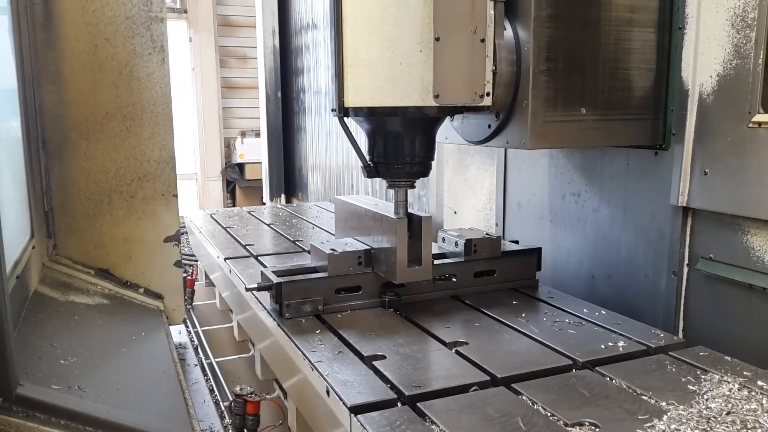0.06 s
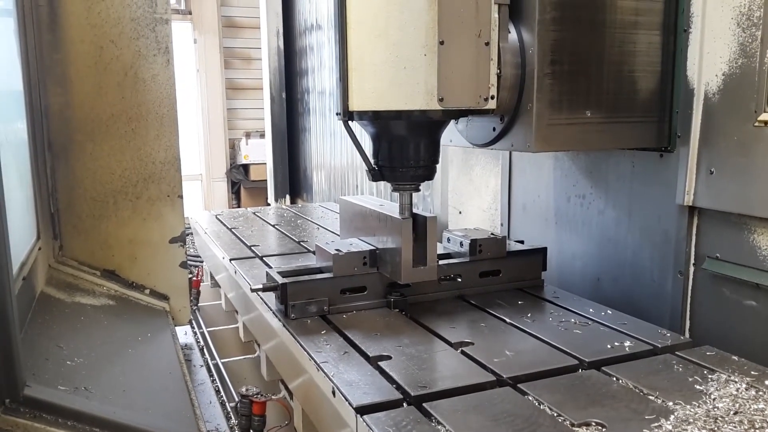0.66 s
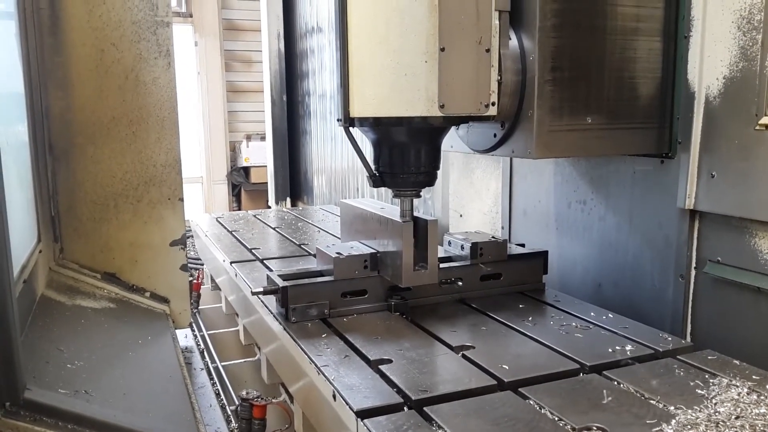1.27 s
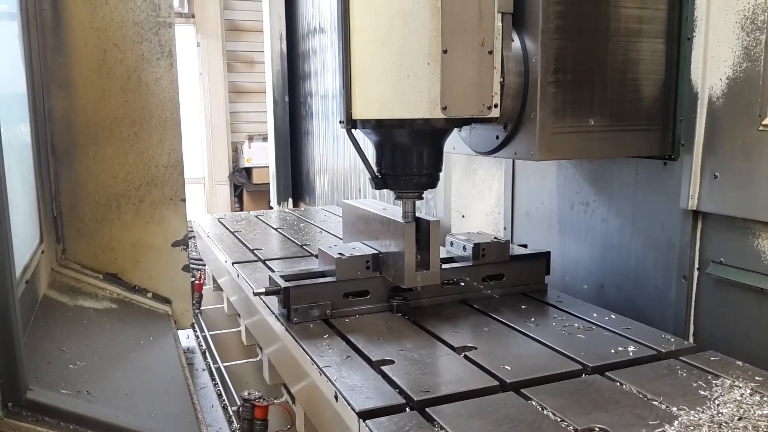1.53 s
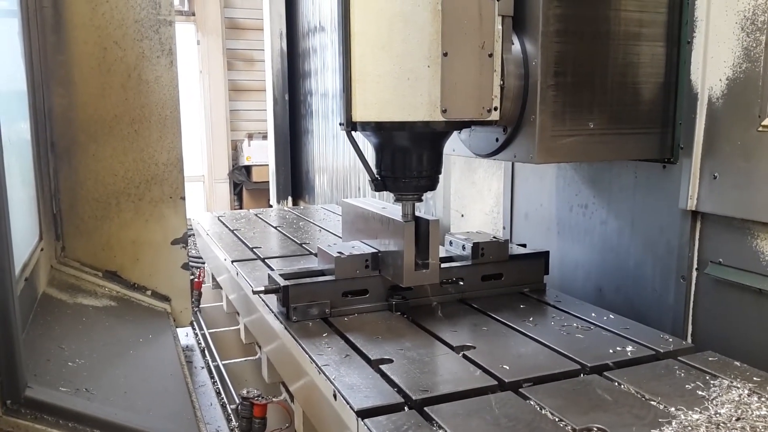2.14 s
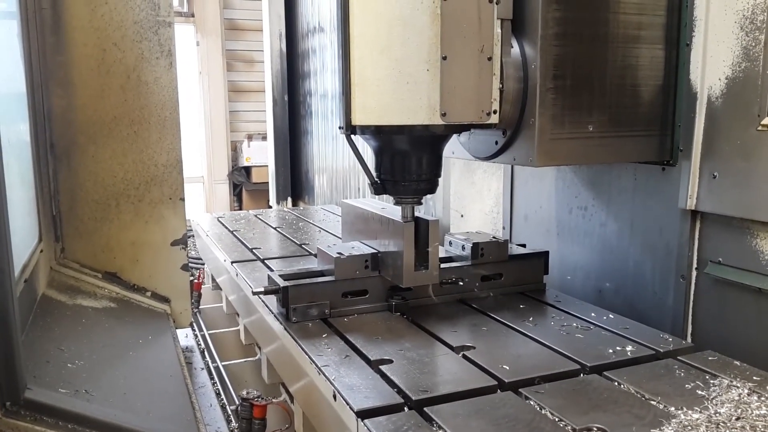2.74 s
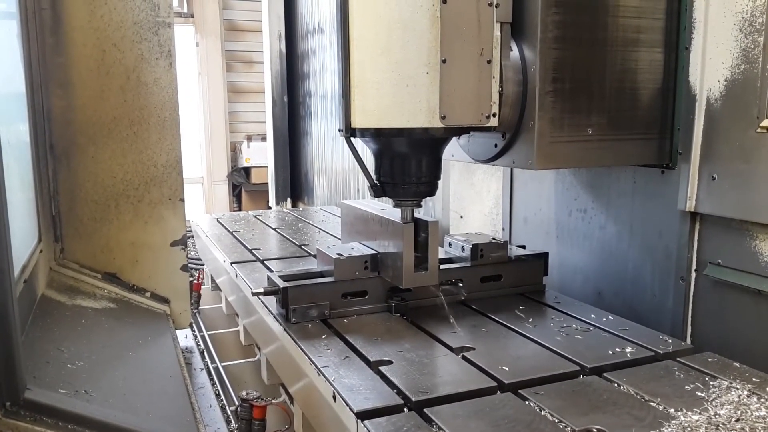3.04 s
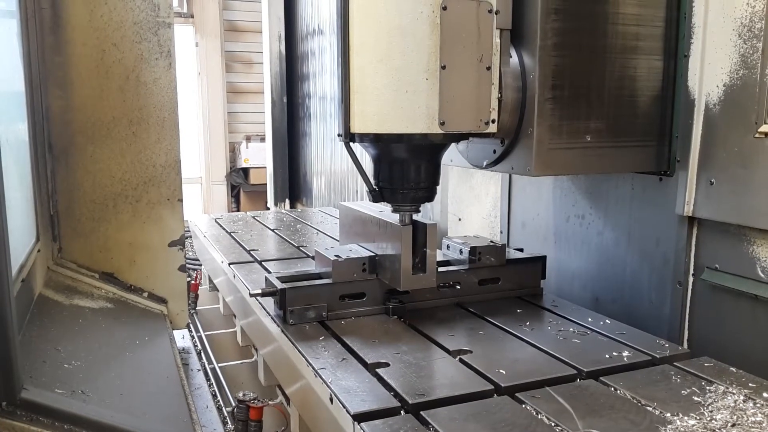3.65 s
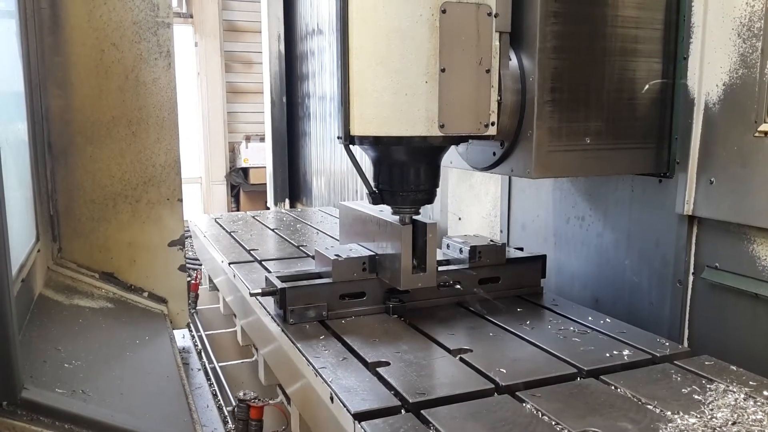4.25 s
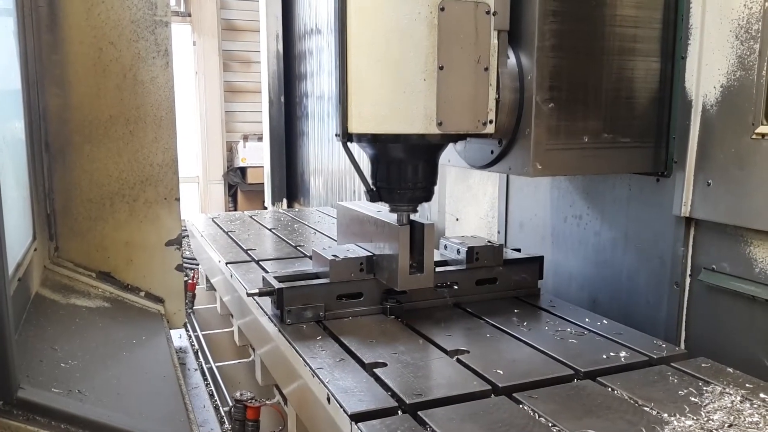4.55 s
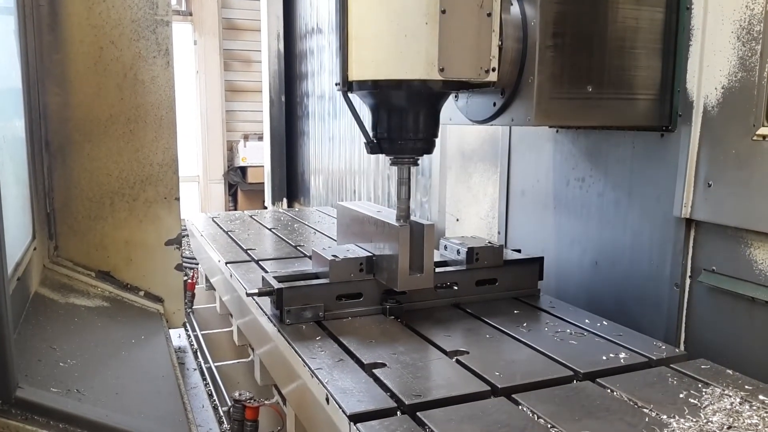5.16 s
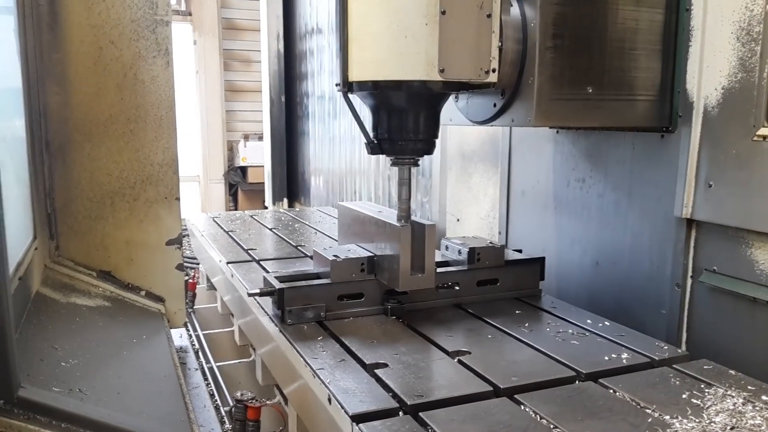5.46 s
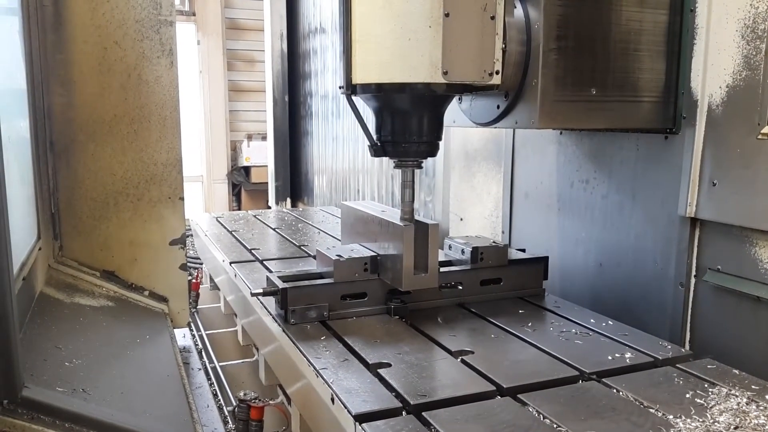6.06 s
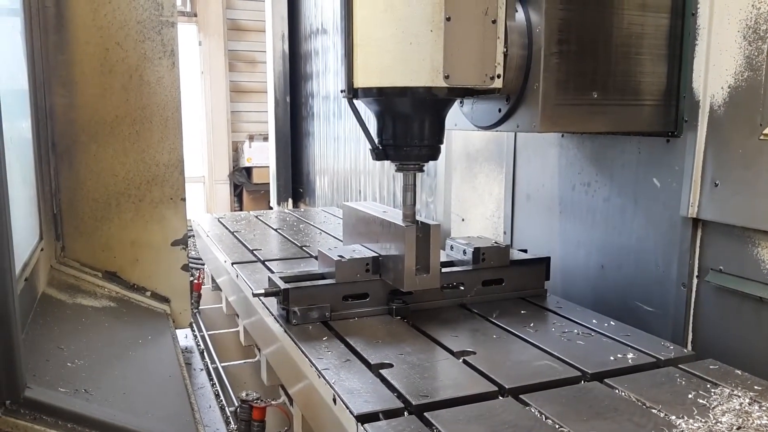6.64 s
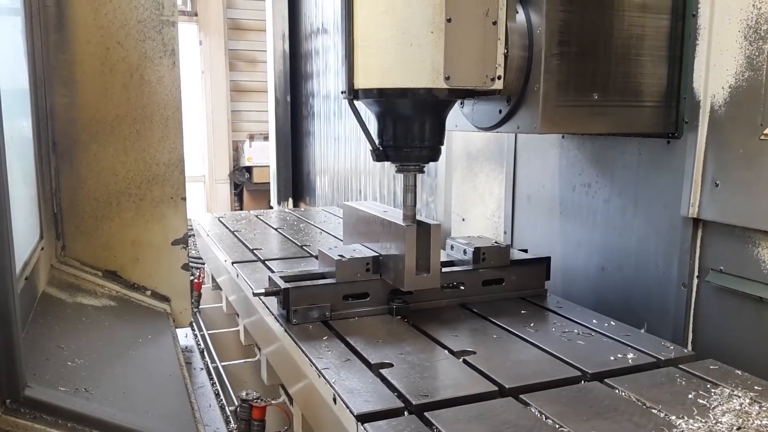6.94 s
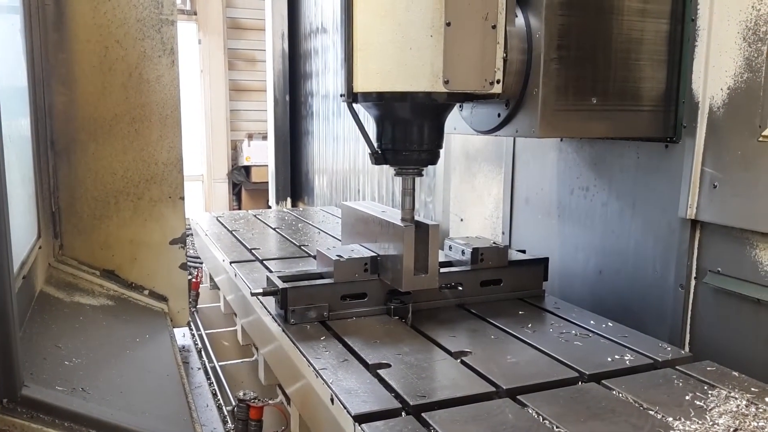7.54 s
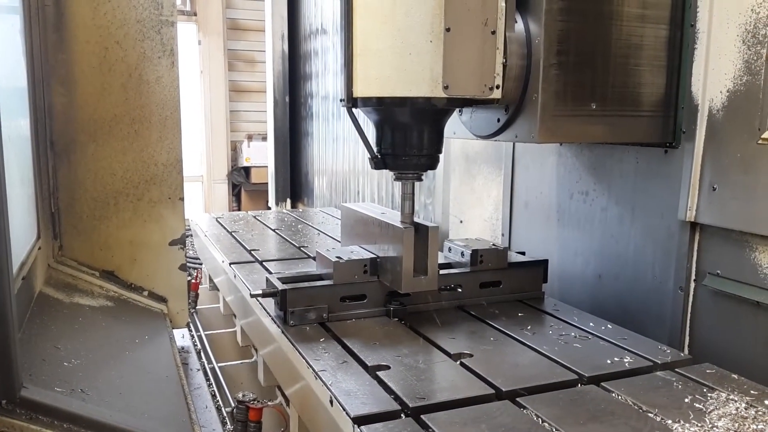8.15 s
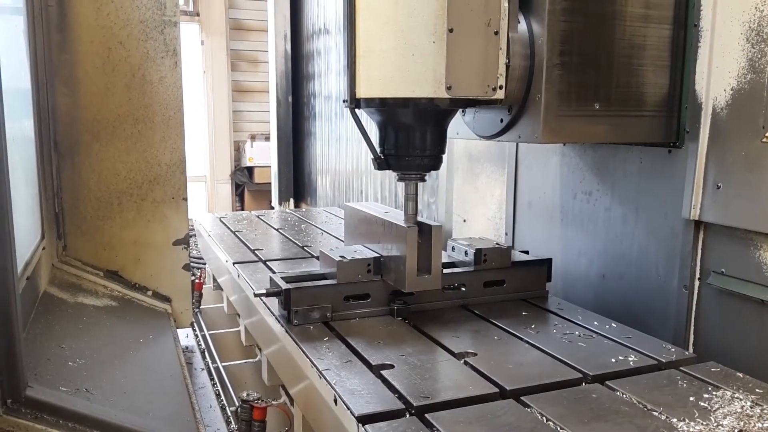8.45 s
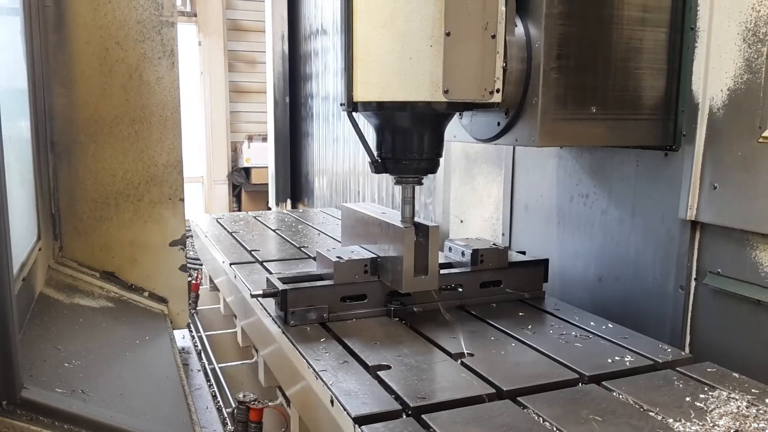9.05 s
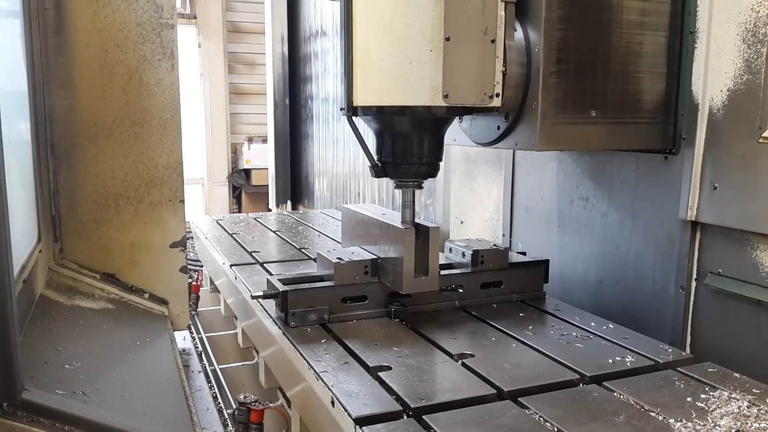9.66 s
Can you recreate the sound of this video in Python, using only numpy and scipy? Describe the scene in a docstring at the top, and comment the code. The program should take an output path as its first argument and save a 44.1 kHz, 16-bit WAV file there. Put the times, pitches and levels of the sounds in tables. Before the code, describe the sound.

A milling machine rasps through metal under a hissing, whistling air jet, judders briefly in the middle, then lifts clear while the air keeps blowing.

```python
"""A four-flute end mill cuts a metal block in a machining centre, cleared by compressed air. From the start the
jet hisses, whistles on the turning flutes and blows the slot into a hollow tone; the cutter rasps over dull
pops and workshop noise. At 4.5 s it judders in a corner over a run of dull pops. At 5 s it rubs the wall and
lifts clear while the air keeps blowing. From about 8 s it eases back in."""
import sys
import numpy as np
from scipy import signal
from scipy.fft import rfft, irfft, next_fast_len
from scipy.io import wavfile
from scipy.ndimage import uniform_filter1d, minimum_filter1d

SR = 44100
rng = np.random.default_rng(int(sys.argv[2]) if len(sys.argv) > 2 else 0)


def generate_wav(sig):
    """Save sig (samples, or channels by samples) to the path in sys.argv[1] as 16-bit PCM at SR."""
    pcm = np.round(np.clip(np.atleast_2d(sig).T, -1, 1) * 32767).astype(np.int16)
    wavfile.write(sys.argv[1], SR, pcm)


N = 432179
TIME_S = np.arange(N) / SR
FLUTE_HZ = 80.0   # flute passing rate


def from_db(db):
    """Decibels to gain."""
    return 10 ** (np.asarray(db) / 20)


def unit_rms(x):
    """Scale the channel mean to rms 1."""
    return x / np.sqrt(np.mean(np.abs(np.atleast_2d(x).mean(0)) ** 2) + 1e-20)


def curves(rows):
    """One per-sample curve for each column after time_s."""
    time_s, *columns = np.transpose(rows)
    return [np.interp(TIME_S, time_s, column) for column in columns]


def panned(pan_db):
    """Stereo gains of unit mean power; pan_db is left over right."""
    ratio = from_db(np.atleast_1d(pan_db))
    return np.array([ratio, np.ones_like(ratio)]) * np.sqrt(2 / (1 + ratio ** 2))


def drift(rate_hz):
    """Slow random curve, rms 1."""
    hop, settle = 20, 2000
    pole = np.exp(-2 * np.pi * hop * rate_hz / SR)
    noise = rng.standard_normal(N // hop + settle + 2)
    slow = signal.lfilter([1], [1, -2 * pole, pole * pole], noise)[settle:]
    return np.interp(np.arange(N) / hop, np.arange(len(slow)), unit_rms(slow))


def stereo_noise(correlation, size=N):
    """White noise, partly shared by both sides."""
    noise = rng.standard_normal((3, size))
    return np.sqrt(correlation) * noise[0] + np.sqrt(1 - correlation) * noise[1:]


def shaped_noise(spectrum, correlation):
    """Noise with a separate spectrum per side, rms 1."""
    size = next_fast_len(N, real=True)
    log_hz = np.log(np.maximum(np.arange(size // 2 + 1) * SR / size, 1))
    freq_hz, *sides_db = np.transpose(spectrum)
    gain = from_db([np.interp(log_hz, np.log(freq_hz), side) for side in sides_db])
    return unit_rms(irfft(rfft(stereo_noise(correlation, size)) * gain, size)[:, :N])


def resonate(x, centre_hz, width_hz):
    """Resonance with steep skirts."""
    edges_hz = [centre_hz - width_hz / 2, centre_hz + width_hz / 2]
    return signal.sosfilt(signal.butter(2, edges_hz, "band", fs=SR, output="sos"), x + 1e-18)


def narrow_noise(centre_hz, width_hz):
    """Noise band whose centre may move, rms 1."""
    phase = 2 * np.pi * np.cumsum(centre_hz * np.ones(N)) / SR
    return drift(width_hz) * np.cos(phase) + drift(width_hz) * np.sin(phase)


def flute_swing(rate_ratio=1):
    """Cosine at rate_ratio times the flute rate."""
    return np.cos(2 * np.pi * FLUTE_HZ * rate_ratio * (TIME_S + .005))


# Jet strength: time_s, hiss_db, fizz_db
JET_LEVELS = [(0, -22.5, -30), (2.6, -23, -31.3), (3.5, -21.5, -30), (4.3, -21.5, -28.5),
              (4.65, -23.2, -31.3), (5.3, -24, -29), (6.6, -23.5, -29), (7.0, -23.5, -30.3),
              (7.7, -23, -29.8), (8.3, -23.5, -30.3), (9.8, -23, -30.3)]
# Hiss spectrum: freq_hz, left_db, right_db
HISS_SPECTRUM = [(637, -74.5, -76), (1600, -63, -65.5), (2465, -55, -57.5), (3080, -61.5, -66),
                 (4100, -60, -67), (4700, -57, -62.5), (5120, -59, -65.5), (5750, -51, -67.5),
                 (6560, -52.5, -89), (6970, -48.5, -68.5), (8240, -56.5, -72), (8850, -62.5, -68.5),
                 (10700, -64, -75), (13000, -67, -85)]
# Top fizz spectrum: freq_hz, left_db, right_db
FIZZ_SPECTRUM = [(7540, -104.5, -100), (10650, -61, -79), (11300, -53, -67), (13000, -58.5, -63.5),
                 (15200, -59.5, -63.5), (17000, -63.5, -65)]


def air_jet(hiss_gain_db=1.5, fizz_gain_db=3.5, flutter_depth=0.027, waver_db=0.7):
    """Broad nozzle hiss, faintly stirred by the flutes."""
    hiss_db, fizz_db = curves(JET_LEVELS)
    hiss = from_db(hiss_db + hiss_gain_db) * shaped_noise(HISS_SPECTRUM, correlation=0.095)
    fizz = from_db(fizz_db + fizz_gain_db) * shaped_noise(FIZZ_SPECTRUM, correlation=0)
    return (hiss + fizz) * (1 + flutter_depth * flute_swing()) * from_db(waver_db * drift(7.1))


# Whistle dropouts: start_s, length_s, loss_db
WHISTLE_FALTERS = [(0.03, .04, 3), (0.28, .07, 3), (0.59, 0.099, 12), (0.81, 0.23, 10), (1.77, .08, 6),
                   (1.89, .16, 19), (2.38, 0.075, 2), (3.27, .06, 4), (5.58, 0.055, 3), (5.88, 0.082, 3),
                   (6.07, .13, 3), (6.95, .21, 5), (7.53, 0.08, 5), (7.98, .04, 4), (8.39, .06, -2.5),
                   (8.51, .05, 12), (8.63, .05, 8), (8.73, 0.063, 4), (8.89, 0.044, 9), (8.98, .14, 3.5)]


def faltering(roughness, stumble_hz=16, stumble_db=5, edge_s=.03):
    """Whistle slip (0-1) and loss: timed falters plus random stumbles of a rough jet."""
    slip = np.clip(1.6 * roughness * (drift(stumble_hz) - .5), 0, 1)
    loss_db = stumble_db * slip
    for start_s, length_s, falter_db in WHISTLE_FALTERS:
        inside_s = np.minimum(TIME_S - start_s, start_s + length_s - TIME_S)
        gate = np.clip(.5 + inside_s / edge_s, 0, 1)
        slip = np.maximum(slip, gate)
        loss_db = np.maximum(loss_db, falter_db * gate)
    return slip, loss_db


# Unbroken edge tone: time_s, pitch_hz, level_db
WHISTLE_TONE = [(0, 11360, -23), (1.4, 11280, -23.5), (2.7, 11280, -22.5), (3.1, 11270, -24),
                (3.75, 11370, -20), (4.2, 11380, -22.5), (4.45, 11380, -25.5), (4.96, 11400, -24.5),
                (5.07, 11350, -18.2), (5.55, 11350, -20.5), (6.4, 11300, -29), (7.2, 11335, -27),
                (7.7, 11360, -22), (8.3, 11350, -24), (9.2, 11305, -22), (9.8, 11305, -21.7)]
# Chopping by the cutter: time_s, flute_rate_depth, half_rate_depth, roughness
WHISTLE_CHOP = [(0, .3, .28, 0.48), (1, 0.36, 0.54, .48), (2.5, .7, 0.55, 0.3), (3.2, .32, .39, .33),
                (4.6, .27, 0.24, 0.32), (5.1, .27, .03, 0.06), (5.55, .41, .03, 0), (5.9, 0.35, .1, .26),
                (7.6, 0.3, .24, .29), (8.9, .15, .24, 0.18), (9.8, 0.098, 0.76, 0.15)]


def whistle(gain_db=4.0, width_hz=80, flat_hz=200.4, bend_hz=60, wander_hz=55, skirt_db=-11, smear=0.85):
    """Edge tone of the jet on the cutter; each passing flute dips its level and pitch."""
    pitch_hz, level_db = curves(WHISTLE_TONE)
    flute_depth, half_depth, roughness = curves(WHISTLE_CHOP)
    slip, loss_db = faltering(roughness)
    swing = flute_depth * flute_swing() + half_depth * flute_swing(rate_ratio=.5)
    sag = (1 - drift(rate_hz=45) ** 2) / np.sqrt(2)   # disturbances pull furthest downward
    unrest = np.sqrt(2 * roughness)
    pitch_hz = pitch_hz - flat_hz * slip + unrest * (bend_hz * swing + wander_hz * sag)
    turbulence = (drift(width_hz) + 1j * drift(width_hz)) / np.sqrt(2)
    amplitude = (1 + swing) * (np.sqrt(1 - roughness) + np.sqrt(roughness) * turbulence)
    amplitude = amplitude / np.sqrt(1 + np.abs(amplitude / 3) ** 2)   # saturation
    tone = unit_rms(np.real(amplitude * np.exp(2j * np.pi * np.cumsum(pitch_hz) / SR)))
    left = tone + from_db(skirt_db) * unrest * narrow_noise(pitch_hz - 150, width_hz=170)
    # wall reflections only: inverted, smeared
    right = np.sqrt(smear) * narrow_noise(pitch_hz, width_hz / 2) - np.sqrt(1 - smear) * left
    pan_db = 16 + (level_db - level_db.mean()) - 0.3 * loss_db   # a strong whistle beams left
    return np.array([left, right]) * panned(pan_db) * from_db(level_db - loss_db + gain_db)


# Air across the slot: time_s, upper_hz, upper_db, lower_db
SLOT_RESONANCES = [(0, 1218, -30, -36.5), (1.4, 1229, -33, -38.5), (2.4, 1244, -33, -40),
                   (3.5, 1242, -36, -45.5), (4.4, 1243, -38, -45), (4.82, 1195, -34.3, -36),
                   (5.6, 1196, -36.3, -40), (7.7, 1201, -35.5, -36.5), (8.4, 1193, -31.5, -34),
                   (9.8, 1191, -32.3, -35)]


def slot(gain_db=3.0, lower_hz=1030, rush_hz=1130, rush_db=-5):
    """The jet blows two hollow resonances of the milled slot, over a broader rush."""
    upper_hz, upper_db, lower_db = curves(SLOT_RESONANCES)
    mean_hz = upper_hz.mean()
    steady = resonate(stereo_noise(correlation=0.4), mean_hz, width_hz=130)
    read_index = np.cumsum(upper_hz / mean_hz)
    upper = np.array([np.interp(read_index, np.arange(N), side) for side in steady])
    lower = resonate(stereo_noise(correlation=0.28), lower_hz, width_hz=110)
    rush = resonate(stereo_noise(correlation=0.34), rush_hz, width_hz=400)
    body = lower / lower.std() + from_db(rush_db) * rush / rush.std()
    return (from_db(upper_db + gain_db) * panned(-9) * upper / upper.std()
            + from_db(lower_db + gain_db) * panned(-2) * body)


def enclosure(gain_db=-10, centre_hz=450, width_hz=200, pan_db=3):
    """The slot's rush excites a low cabin resonance."""
    _, _, lower_db = curves(SLOT_RESONANCES)
    cabin = unit_rms(resonate(stereo_noise(correlation=0.57), centre_hz, width_hz))
    return from_db(lower_db + gain_db) * panned(pan_db) * cabin


def flute_bites(rise_s=0.00065, decay_s=0.0077, uneven_db=0.5):
    """Force envelope, rms 1: each flute bites with its own strength, then the force decays."""
    flute, phase = np.divmod(TIME_S * FLUTE_HZ + .3, 1)
    age_s = phase / FLUTE_HZ
    strength = from_db(uneven_db * np.clip(rng.standard_normal(int(flute[-1]) + 1), -2, 2))
    return unit_rms(strength[flute.astype(int)] * (np.exp(-age_s / decay_s) - np.exp(-age_s / rise_s)))


# Cutting load: time_s, level_db, tilt_db_per_octave
CUTTER_LOAD = [(0, -30, -5.5), (1, -27.5, -5), (2.1, -25, -1), (3.8, -24.5, 3), (4.3, -27.5, 6),
               (4.62, -21, -4.5), (4.8, -30, -1.5), (4.95, -27, -1.5), (5.1, -70, -2), (7.7, -60, -4),
               (8.5, -39, -4), (9.8, -34, -4)]
# Tool and workpiece modes: freq_hz, width_hz, rasp_db, screech_db, pan_db
TOOL_MODES = [(1587, 430, -9.5, -8.5, 3.5), (2046, 204, -3, -4.5, -2.5), (2267, 76, 0, -13, 4.5),
              (2374, 270, -6, 0.5, 15), (2469, 112, -2.5, 1.5, 3), (2620, 93, -3.5, -21, 1),
              (2896, 185, -4.5, -13, 5), (3680, 410, -5, -25, 6.5), (4675, 530, -5.5, 0, 5),
              (6080, 800, -1, -28, 22), (7040, 370, -13, 4, 20)]
# Judder in the corner: time_s, level_db, pitch_ratio
CORNER_JUDDER = [(4.46, -70, 1.04), (4.472, -14, 0.99), (4.51, -20, 1.1), (4.54, -15, 1.02),
                 (4.63, -19, .985), (4.74, -14.5, .99), (4.85, -28.5, 1.02), (4.97, -56, .97)]


def cutter(grain_db=1.0, judder_gain_db=1.5, pivot_hz=2500):
    """Tearing chips ring tool and work; in the corner each bite sets the same modes screeching."""
    load_db, tilt_db_per_octave = curves(CUTTER_LOAD)
    judder_db, pitch_ratio = curves(CORNER_JUDDER)
    tearing = stereo_noise(correlation=0.32) * from_db(grain_db * drift(60))
    rasp, screech = 0, 0
    for freq_hz, width_hz, rasp_db, screech_db, pan_db in TOOL_MODES:
        tilt = from_db(tilt_db_per_octave * np.log2(freq_hz / pivot_hz))
        mode = panned(pan_db) * unit_rms(resonate(tearing, freq_hz, width_hz)) * tilt
        rasp = rasp + from_db(rasp_db) * mode
        screech = screech + from_db(screech_db) * mode
    read_index = np.cumsum(pitch_ratio) % N   # pitch sinks as more of the cutter engages
    screech = np.array([np.interp(read_index, np.arange(N), side) for side in screech])
    bites = from_db(judder_db + judder_gain_db) * flute_bites()
    return from_db(load_db) * unit_rms(rasp) + bites * unit_rms(screech)


def dull_pop(high_hz, low_hz=105):
    """Short pressure pulse and rebound, peak 1."""
    band = signal.butter(2, [low_hz, high_hz], "band", fs=SR, output="sos")
    pop = signal.sosfilt(band, signal.unit_impulse(SR // 20))
    return pop / pop.max()


# Low patter, dipping as the cutter leaves the wall: time_s, level_db
BUFFET_LEVELS = [(0, -55), (1.9, -49), (2.3, -43.5), (3.4, -42.5), (4.75, -41), (4.88, -55), (5.2, -41),
                 (6.0, -57), (7.3, -47), (9.1, -51), (9.7, -44)]
# Single bass pops: time_s, peak_db
BASS_POPS = [(0.117, -18), (1.32, -16), (1.67, -11), (2.505, -17), (2.621, -19), (2.673, -17.5),
             (3.567, -15), (3.723, -12), (3.856, -13.5), (4.264, -12), (5.316, -14.5), (5.458, -18),
             (5.693, -18), (7.467, -15.5), (8.71, -17)]


def buffeting(gain_db=3.5, pops_per_s=200, uneven_db=6.0, judder_gain_db=-15, right_db=-22):
    """Dull pops on the left: a patter that swells with the judder, plus single large ones."""
    clicks = (rng.random(N) < pops_per_s / SR) * rng.choice([-1, 1], N)
    clicks = clicks * from_db(uneven_db * np.clip(rng.standard_normal(N), -2, 2))
    patter_db, judder_db = curves(BUFFET_LEVELS)[0], curves(CORNER_JUDDER)[0]
    strength = from_db(patter_db + gain_db) + from_db(judder_db + judder_gain_db)
    left = strength * unit_rms(signal.fftconvolve(clicks, dull_pop(high_hz=450))[:N])
    for time_s, peak_db in BASS_POPS:
        pop = from_db(peak_db) * dull_pop(high_hz=510)
        start = int(time_s * SR) - pop.argmax()
        left[start:start + len(pop)] -= pop
    return np.array([left, from_db(right_db) * left])


# Workshop noise spectrum: freq_hz, left_db, right_db
SHOP_SPECTRUM = [(20, -95, -96), (50, -100, -101), (100, -75.5, -78), (188, -69.5, -69),
                 (242, -65.5, -69.5), (307, -67.5, -69.5), (399, -65.5, -69.5), (536, -65, -69),
                 (726, -69, -64), (880, -66, -59), (1550, -74.5, -68.5), (2050, -114, -111)]


def workshop(floor_db=-39, hum_db=-60, hum_pan_db=4):
    """Dull machine noise plus cutter hum at flute rate."""
    hum = np.sqrt(2) * flute_swing() * from_db(hum_db) * panned(hum_pan_db)
    return from_db(floor_db) * shaped_noise(SHOP_SPECTRUM, correlation=0.59) + hum


def judder_pops(gain_db=5.0, uneven_db=2.2, jitter_s=0.00158, right_db=-20):
    """During the judder a dull pop falls on each flute pass, slightly early or late."""
    pass_s = np.arange(1, int(N / SR * FLUTE_HZ)) / FLUTE_HZ
    lateness, scatter = np.clip(rng.standard_normal((len(pass_s), 2)), -2, 2).T
    hits = np.clip((pass_s + jitter_s * lateness) * SR, 0, N - 1).astype(int)
    judder_db, _ = curves(CORNER_JUDDER)
    clicks = np.zeros(N)
    clicks[hits] = from_db(judder_db[hits] + gain_db + uneven_db * scatter)
    left = -signal.fftconvolve(clicks, dull_pop(high_hz=700))[:N]
    return np.array([left, from_db(right_db) * left])


# Wall contact: time_s, level_db
RUB_LEVELS = [(4.97, -80), (4.995, -28), (5.04, -24), (5.07, -80)]


def wall_rub(pitch_hz=2450, width_hz=50, pan_db=3):
    """Brief thin squeal as the lifting tool rubs the wall."""
    return from_db(curves(RUB_LEVELS)[0]) * panned(pan_db) * narrow_noise(pitch_hz, width_hz)


def scene():
    """Air, cutter and workshop, summed in stereo."""
    air = air_jet() + whistle() + slot() + enclosure()
    return air + cutter() + buffeting() + workshop() + judder_pops() + wall_rub()


def record(dry, low_cut_hz=42, high_cut_hz=15500, ceiling=.85):
    """Bass cut, peak limiter, steep treble cut."""
    thinned = signal.sosfilt(signal.butter(2, low_cut_hz, "high", fs=SR, output="sos"), dry)
    max_gain = ceiling / np.maximum(np.abs(thinned), ceiling)
    limited = thinned * uniform_filter1d(minimum_filter1d(max_gain, size=129), size=129)
    return signal.sosfilt(signal.ellip(12, .1, 80, high_cut_hz, fs=SR, output="sos"), limited)


dry = scene()
out = record(dry)
generate_wav(out)
```